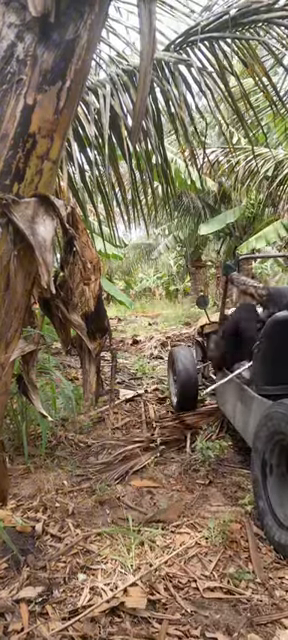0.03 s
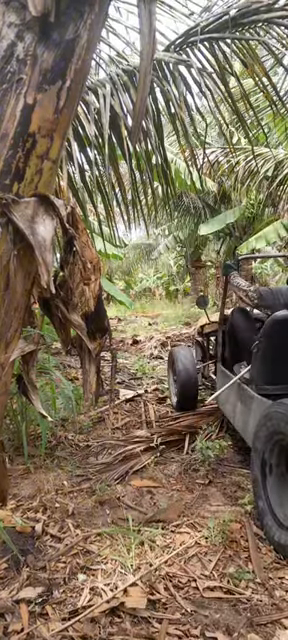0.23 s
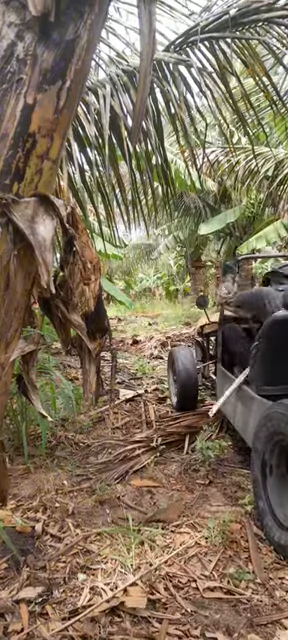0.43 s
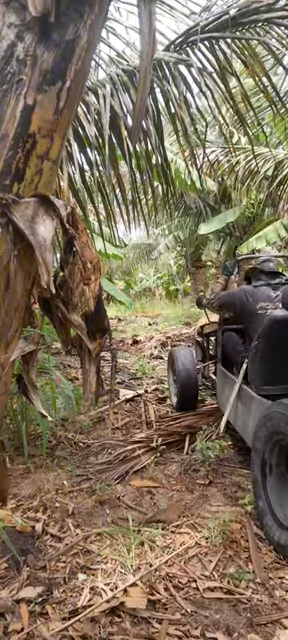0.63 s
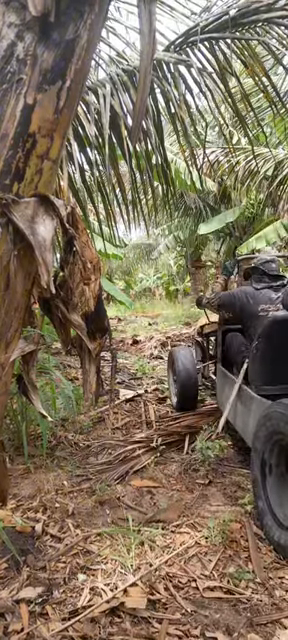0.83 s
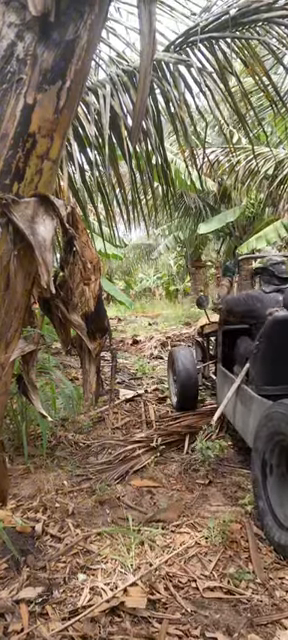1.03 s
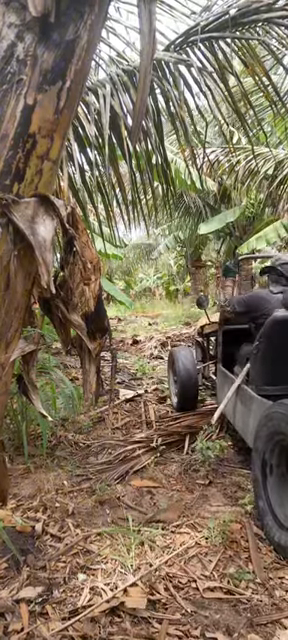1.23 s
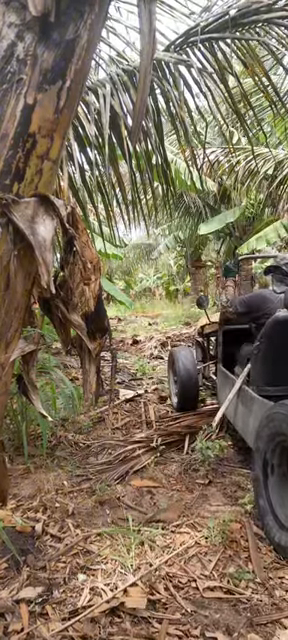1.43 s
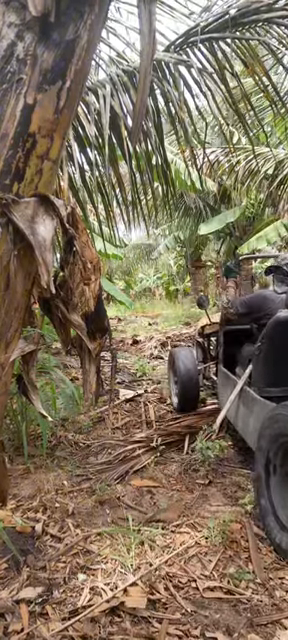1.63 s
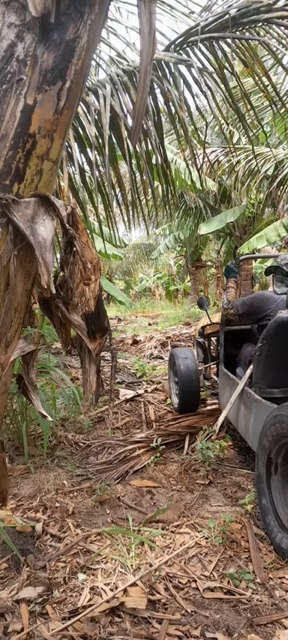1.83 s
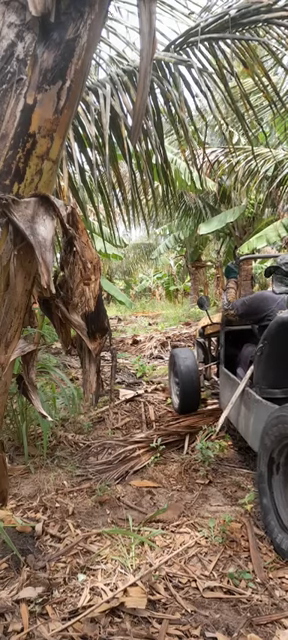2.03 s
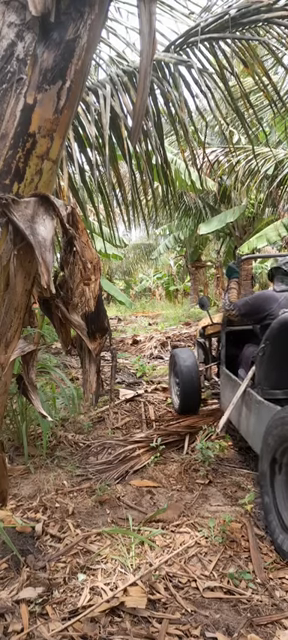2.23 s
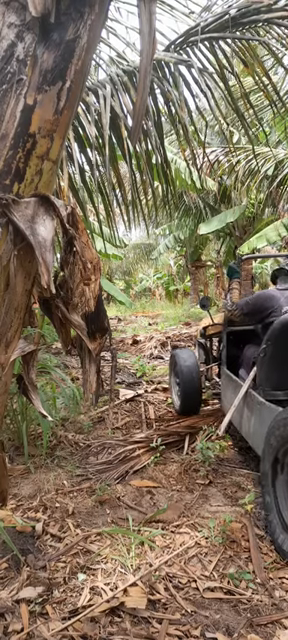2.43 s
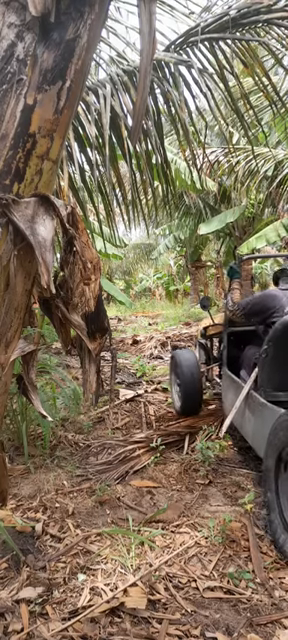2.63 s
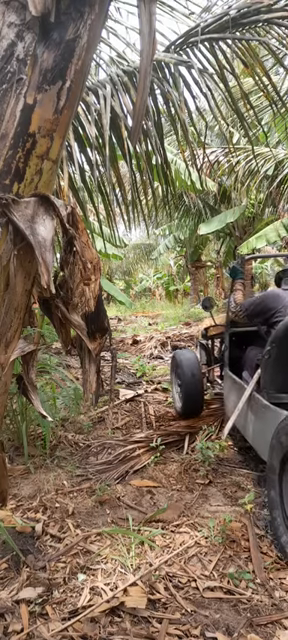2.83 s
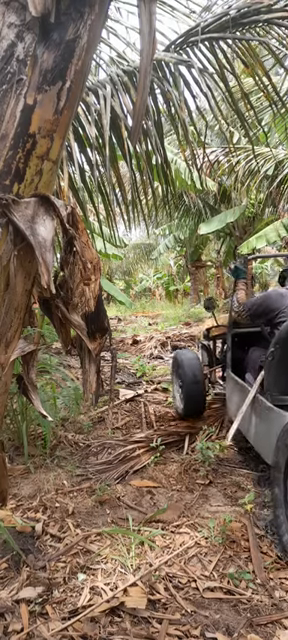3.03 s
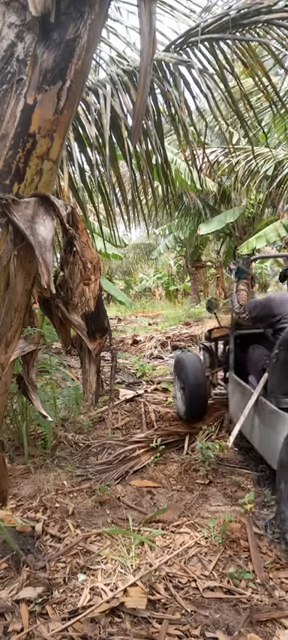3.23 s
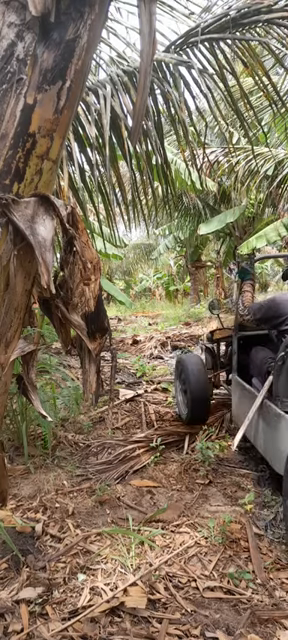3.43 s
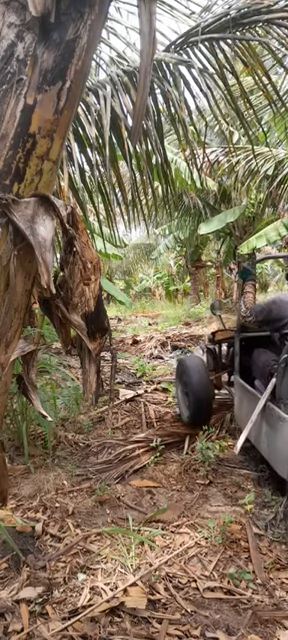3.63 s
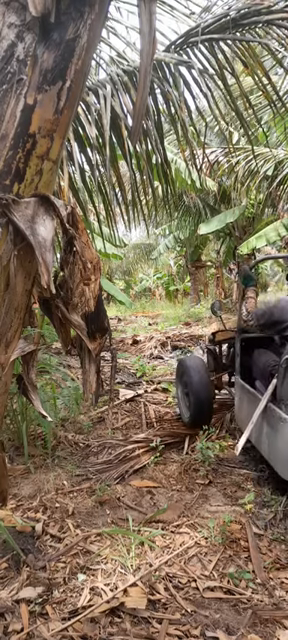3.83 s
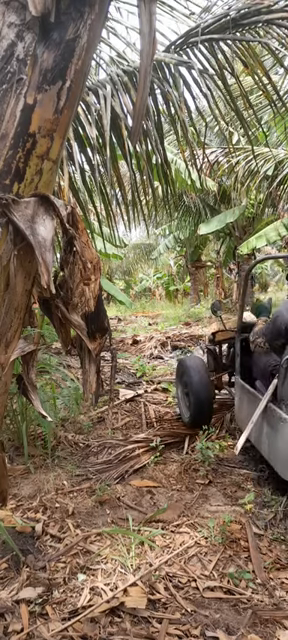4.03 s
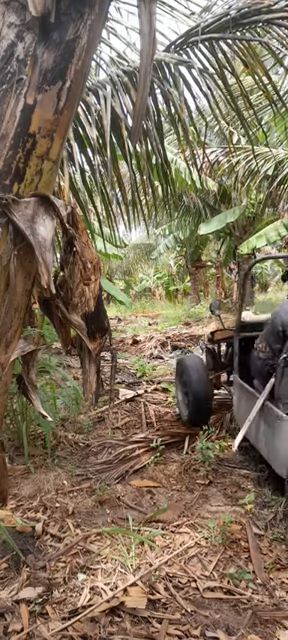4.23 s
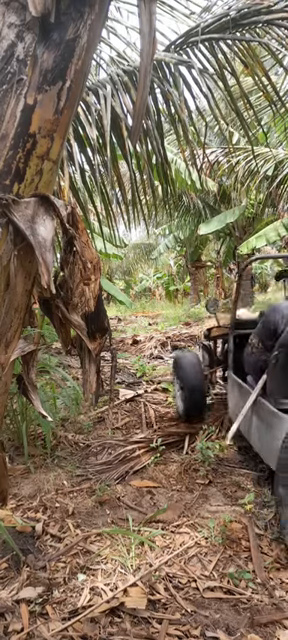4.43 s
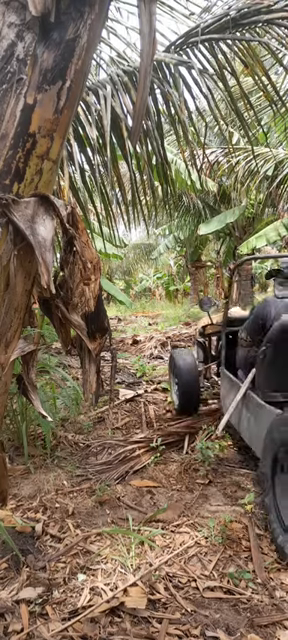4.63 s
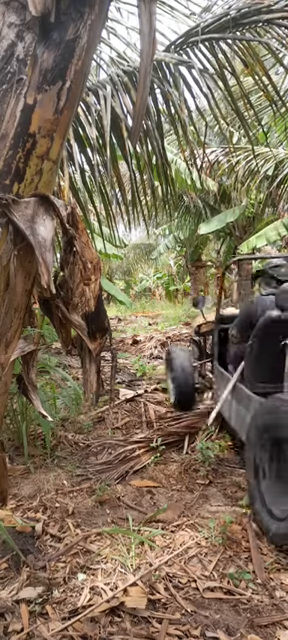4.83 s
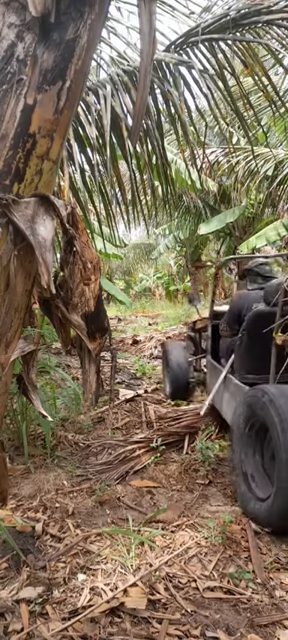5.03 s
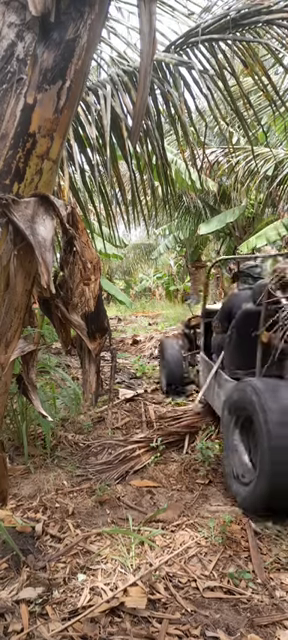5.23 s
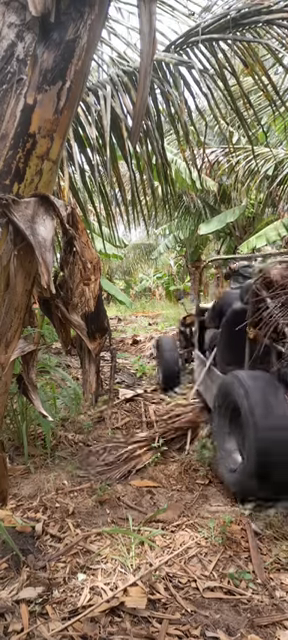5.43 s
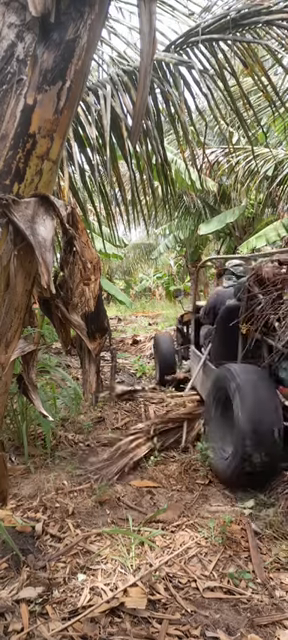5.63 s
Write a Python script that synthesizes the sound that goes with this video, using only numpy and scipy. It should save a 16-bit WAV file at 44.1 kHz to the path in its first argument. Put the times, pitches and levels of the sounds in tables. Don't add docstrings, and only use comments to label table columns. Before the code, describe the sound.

Quiet open air with low generator hum, dry rustling and small clicks, then louder lever clacks and a grinding starter. The engine catches in uneven thumps, falters and catches again, flares with raspy puffs and one backfire, then is revved to a fast buzzing throb before slowing to separate chugs. Close small-camera stereo sound, rattling metal, only slight short echoes from trunks and ground.

```python
import sys
import numpy as np
from scipy import signal
from scipy.fft import rfft, irfft
from scipy.io import wavfile
from scipy.ndimage import uniform_filter1d

SR = 44100
rng = np.random.default_rng(int(sys.argv[2]) if len(sys.argv) > 2 else 0)


def store_pcm(level_fs):
    pcm = np.round(np.clip(level_fs, -1, 1) * 32767).astype(np.int16)
    wavfile.write(sys.argv[1], SR, np.atleast_2d(pcm).T)


def attenuation_scalar(level_db):
    decades = np.asarray(level_db, float) / 20
    return 10 ** decades


N = 251370
TIME = np.arange(N) / SR


def curve(rows, column):
    rows = np.array(rows)
    return np.interp(TIME, rows[:, 0], rows[:, column])


def gains(points):
    hz, db = np.transpose(points)
    return np.interp(np.log(np.arange(N // 2 + 1) * SR / N + 1), np.log(hz + 1), db)


def hiss(points, alike_hz=1600):
    mid, side = (rfft(rng.standard_normal(N)) * attenuation_scalar(gains(points)) for _ in range(2))
    hz = np.arange(N // 2 + 1) * SR / N
    side = side * hz / np.hypot(hz, alike_hz)
    both = irfft(np.array([mid + side, mid - side]), N)
    return both / np.sqrt(np.mean(both ** 2))


def resonate(x, table):
    total = 0
    for hz, width, db in table:
        b, a = signal.iirpeak(hz, hz / width, fs=SR)
        total = total + attenuation_scalar(db) * signal.lfilter(b, a, x)
    return total


def modes(x, table):
    y = resonate(x, table)
    return y / np.sqrt(np.mean(y ** 2))


def walk(rate):
    k = int(SR / rate)
    held = np.repeat(rng.standard_normal(N // k + 1), k)
    return 1.2 * uniform_filter1d(held, k)[:N]


def add(out, s, grain):
    i = max(int(round(s * SR)), 0)
    out[i:i + len(grain)] += grain[:max(N - i, 0)]


def burst(rise_s, fall_s):
    t = np.arange(int(SR * (3 * rise_s + 8 * fall_s))) / SR
    shape = (1 - np.exp(-t / rise_s)) ** 2 * np.exp(-t / fall_s)
    return shape / shape.max()


def swells(rows, column, fall_db_s, floor_db):
    ramps = []
    for row in rows:
        climb_db_s = 20 / row[-1]
        below_db = np.where(TIME < row[0], climb_db_s * (row[0] - TIME), fall_db_s * (TIME - row[0]))
        ramps.append(row[column] - below_db)
    return np.maximum(np.max(ramps, axis=0), floor_db)


# f/Hz, level/dB
GENERATOR_HUM = [(59.2, -48.5), (118.4, -52.5), (226.1, -61.5), (296.1, -60), (506.0, -64.5), (759.0, -60)]
# f/Hz, width/Hz, level/dB
GENERATOR_FAN = [(3110, 83, -2), (3355, 82, 0.1), (3640, 57, -5), (3930, 67, -13), (4600, 93, -14)]


def generator():
    hum = 0
    for hz, db in GENERATOR_HUM:
        wavering_s = TIME + np.cumsum(.014 * walk(20)) / SR
        hum = hum + attenuation_scalar(db + 2 * walk(9.8)) * np.sqrt(2) * np.sin(2 * np.pi * hz * wavering_s)
    fan = attenuation_scalar(-52.5) * modes(hiss([(100, 0), (16000, 0)]), GENERATOR_FAN)
    return hum + fan


# f/Hz, level/dB (per Hz)
AIR = [(18, -48), (30, -31), (43, -12.5), (64, 6), (145, -15), (161, -6.5), (210, -24.5), (303, -5),
       (328, -13), (600, -16), (740, -8.5), (1190, -20.5), (4080, -24.5), (5170, -60.5), (16000, -57)]


def outdoor_air():
    level_db = -44 - 1.5 + 0.5 * walk(2.63)
    return attenuation_scalar(level_db) * hiss(AIR, alike_hz=1390)


# t/s, level/dB, time to climb 20 dB/s
RUSTLE = [(0.0, -50.5, .02), (0.076, -47, .015), (0.19, -48, .04), (0.23, -47, .03), (0.305, -52, .04),
          (0.442, -57, .04), (0.61, -50, .06), (0.896, -57, .01), (0.95, -58, .03), (1.072, -46, .045),
          (1.116, -45, .03), (1.242, -44, .065), (1.35, -38, .03), (1.442, -53, .09), (1.57, -57, .15),
          (1.68, -62, .15)]
# f/Hz, level/dB (per Hz)
LEAVES = [(2650, -15), (4500, 1.5), (6030, -3), (7290, -10.5), (8830, -14), (13100, 1), (16000, -10.5)]


def rustle():
    level_db = swells(RUSTLE, column=1, fall_db_s=240, floor_db=-74)
    return attenuation_scalar(level_db + 2.2 + 2.9 * walk(150)) * hiss(LEAVES)


# t/s, length/s, f/Hz, level/dB
CREAKS = [
    (.16, .1, 105, -43),
    (.46, .14, 224, -42),
]


def seat_creaks():
    total = 0
    for s, length, hz, db in CREAKS:
        swell = np.sqrt(np.sin(np.pi * np.clip((TIME - s) / length, 0, 1)))
        total = total + attenuation_scalar(db + 3 * walk(40)) * swell * np.sin(2 * np.pi * hz * TIME)
    return total


def yard():
    return generator() + rustle() + seat_creaks() + outdoor_air()


# t/s, click level/dB, body level/dB under the click, length/s
KNOCKS = [(0.037, -38, -47, 0.02), (0.076, -39, -47, 0.02), (0.188, -33, -51, 0.025),
          (0.23, -40, -57, 0.014), (0.292, -37, -45, 0.035), (0.44, -38, -31, 0.023),
          (0.464, -50, -42, 0.025), (0.515, -48, -38, 0.027), (0.606, -40, -41, 0.02),
          (0.6389, -42, -44, 0.02), (0.895, -40, -48, 0.018), (0.947, -42, -43, 0.024),
          (1.063, -37, -40, 0.024), (1.115, -33, -47, 0.029), (1.175, -38, -42, 0.02),
          (1.238, -26.5, -36, 0.037), (1.3234, -22.5, -48, 0.026), (1.3423, -14, -31, 0.033),
          (1.438, -21.5, -43, 0.06), (1.5745, -26.5, -37, 0.044), (1.6494, -15.5, -42, 0.022),
          (1.7065, -15, -28, 0.023)]
# f/Hz, level/dB (per Hz)
CLICK = [(710, -32), (1200, -4), (2300, -2), (2830, -2), (3870, -1), (8530, -31.5), (13200, -21),
         (15000, -24), (16000, -27)]


def knocks(boom):
    click, body = np.zeros((2, N))
    for s, click_db, body_db, length in KNOCKS:
        add(click, s, attenuation_scalar(click_db - 11) * burst(0.00048, max(.5 * length, .002)))
        add(body, s, attenuation_scalar(body_db - 0.5) * burst(0.00033, max(0.67 * length, .003)))
    return click * attenuation_scalar(3.3 * walk(700)) * hiss(CLICK) + body * boom


# t/s, rumble level/dB, grind level/dB, time to climb 20 dB/s
HEAVES = [(1.19, -39, -48, .03), (1.244, -29.5, -31, .02), (1.375, -28, -25, .05), (1.532, -32, -36, .06),
          (1.735, -32, -25, .06), (1.8, -30, -28, .027)]
# f/Hz, width/Hz, level/dB
HOUSING = [(405, 45, 0), (545, 55, -3), (200, 30, -5)]


def cranking(boom):
    on_s, off_s, motor_db = 1.1, 1.85, -48
    turning = np.clip((TIME - on_s) / 0.046, 0, 1) * np.clip((off_s - TIME) / 0.06, 0, 1)
    rumble_db = swells(HEAVES, column=1, fall_db_s=120, floor_db=motor_db)
    rumble = attenuation_scalar(rumble_db) * modes(rng.standard_normal(N), [(92, 20, 5.0), (160, 78, -16)])
    grind_db = swells(HEAVES, column=2, fall_db_s=150, floor_db=motor_db) - 2.1
    housing = modes(rng.standard_normal(N), HOUSING)
    grind = attenuation_scalar(grind_db) * (attenuation_scalar(-4) * boom + attenuation_scalar(-3) * housing)
    return turning * (rumble + grind)


# multiple of the note, level/dB
SQUEAK_TONES = [(1, -40), (2, -46), (3, -40), (4, -31), (5, -50)]


def belt_squeak():
    start_s, end_s, from_hz, to_hz = 1.614, 1.654, 1024, 1004
    along = np.clip((TIME - start_s) / (end_s - start_s), 0, 1)
    phase = 2 * np.pi * np.cumsum(from_hz + (to_hz - from_hz) * along ** 2) / SR
    tones = sum(attenuation_scalar(db + 3.5 + 4 * walk(200)) * np.sin(k * phase) for k, db in SQUEAK_TONES)
    return np.sqrt(np.sin(np.pi * along ** 2.1)) * tones


# f/Hz, width/Hz, level/dB
BODY = [(223, 31, 10.5), (354, 34, 2.5), (482, 49, 1.7), (635, 66, -1.5), (1033, 430, -2.5)]


def starting():
    boom = modes(hiss(AIR[4:]), BODY)
    return knocks(boom) + cranking(boom) + belt_squeak()


# t/s, speed/rpm
SPEED = [(2.6583, 1020.4), (2.7, 1171.0), (2.85, 1879.0), (2.9, 1573.5), (3.0, 1610.8), (3.12, 1411.1),
         (3.405, 1224.8), (3.461, 1430.8), (3.53, 891.6), (3.649, 1134.1), (3.736, 1092.6), (4.007, 1853.0),
         (4.283, 1943.3), (4.501, 1733.6), (4.671, 1573.0), (4.959, 1107.4), (5.364, 771.0), (5.7, 870.0)]
# t/s, burn level/dB
THROTTLE = [(2.6, -30), (2.66, -8), (2.72, -12.5), (2.84, -15), (2.87, -35), (3.2, -42), (3.41, -31),
            (3.5, -34), (3.7, -19), (3.83, -11), (3.98, -14), (4.11, -15.5), (4.6, -14.5), (4.69, -22),
            (5.11, -21), (5.54, -20), (5.68, -16)]
# f/Hz, level/dB (per Hz)
GEAR = [(210, -5), (350, -7), (452, -1), (653, -11), (1010, -2), (1380, -25.5), (1600, -11), (2460, -16.5),
        (3340, -12), (8710, -33.5), (11300, -23.5), (14800, -29.5), (16000, -19)]
# f/Hz, width/Hz, level/dB
COVERS = [(1007, 100, -1.5), (1775, 90, -4.5), (2075, 72, -1.5), (3220, 99, 1), (4370, 97, 0)]


def decades(rpm):
    full_rpm = 1900
    return np.log10(rpm / full_rpm)


def clatter_db():
    engages_s, lets_go_s, slowest_rpm, mesh_db = 1.6, 2.88, 640, 7.5
    rpm = np.interp(TIME, *np.transpose([(SPEED[0][0] - .08, slowest_rpm)] + list(SPEED)))
    running_db = -28.5 + 42 * decades(rpm) + .06 * curve(THROTTLE, 1)
    drag_db = 9 * np.exp(-np.abs(TIME - 1.8) / .3)
    meshed = np.clip((lets_go_s - TIME) / .08, 0, 1)
    not_yet_db = 30 * np.clip((engages_s + .05 - TIME) / .15, 0, 2)
    return running_db + (mesh_db + drag_db) * meshed - not_yet_db


def clatter():
    steady_db = clatter_db()
    gear = attenuation_scalar(steady_db + 2.2 + 2.4 * walk(60) + 2.24 * walk(400)) * hiss(GEAR, alike_hz=1390)
    ticks_per_s = 160
    ticks = (rng.random(N) < ticks_per_s / SR) * attenuation_scalar(4.2 * rng.standard_normal(N))
    return gear + attenuation_scalar(steady_db - 11) * modes(ticks, COVERS)


# t/s, pressure level/dB, burn level/dB
CATCH = [(1.8078, -6, -12), (1.8717, -7, -10), (1.921, -3.5, -6.5), (1.9638, -2, -8), (2.0005, -9.5, -33),
         (2.049, -14.5, -44), (2.0965, -16.5, -39), (2.1505, -10, -15), (2.1937, -4.5, -11),
         (2.2385, -4, -10), (2.2855, -6.5, -14), (2.3299, -12.5, -29.5), (2.377, -11, -43),
         (2.427, -13, -40), (2.4795, -15, -47), (2.538, -5.5, -12), (2.581, -5, -9.5), (2.6209, -6.5, -10)]
# lateness/s, thump f/Hz, thump t60/s, thump level/dB, puff level/dB, snap share
STUBS = [(0, 101, 0.085, -10.5, -10, .1), (.0004, 116, 0.051, -4, -8.5, 0.58),
         (-.0032, 95, 0.066, -5, 0, 0.51), (-.0028, 88, 0.055, -4.5, -0.3, 0.98)]
# start f/Hz, climb per stroke, quickening, fade/dB per stroke, length/strokes, level/dB
RINGS = [(109.6, .6, 0.154, 13.5, 2, -2.5), (229.2, 0.748, 0.019, 9, 1.3, -25.5),
         (236.2, 0.743, .02, 12, 1.28, -25), (236.5, 0.85, .1, 9, 1.25, -20)]


def strokes():
    done = np.cumsum(curve(SPEED, 1) * (TIME > SPEED[0][0])) / SR / 30
    s = np.interp(np.arange(int(done[-1]) + 1) + 1e-6, done, TIME)
    burn_db = np.interp(s, *np.transpose(THROTTLE))
    rpm = np.interp(s, *np.transpose(SPEED))
    pressure_db = -1.7 + 21 * decades(rpm) + .18 * burn_db
    pressure_db = pressure_db + 4.5 * np.exp(-(s - s[0]) / .07)
    s = s + np.array(STUBS)[np.arange(len(s)) % 4, 0]
    s, pressure_db, burn_db = np.c_[np.transpose(CATCH), [s, pressure_db, burn_db]]
    which = (np.arange(len(s)) - len(CATCH)) % 4
    stub, ring = np.array(STUBS)[which], np.array(RINGS)[which]
    chance = rng.standard_normal((3, len(s)))
    thump_db = pressure_db + stub[:, 3] + .45 * chance[0]
    ring_db = pressure_db + ring[:, -1] + .45 * chance[1]
    puff_db = burn_db + stub[:, 4] + 1.36 * chance[2]
    return s, which, thump_db, ring_db, puff_db


def thump(t, which, gap_s, unburnt):
    _, hz, t60, _, _, snappy = STUBS[which]
    hz = hz * (1 + 0.12 * unburnt)
    before, after = np.minimum(t, 0), np.maximum(t, 0)
    swing = -np.cos(2 * np.pi * hz * t) * np.exp(-(before / 0.0063) ** 2 - np.log(1000) * after / t60)
    snap = np.exp(np.minimum(t + .004, 0) / .0022 - (np.maximum(t + .004, 0) / .0012) ** 2)
    snap_share = snappy * (0.37 + 0.016 / gap_s + 0.55 * unburnt)
    return (1 - 0.41 * unburnt) * swing + snap_share * snap


def climbing_ring(t, which, gap_s, unburnt):
    ring_hz, climb, quickening, fade_db, lasts, _ = RINGS[which]
    before, after = np.minimum(t, 0), np.maximum(t, 0)
    fade_db = fade_db * (1 - 0.16 * unburnt) + 6 * unburnt * np.maximum(after / gap_s - .8, 0)
    turn = np.minimum(after / gap_s, lasts)
    note_hz = ring_hz * np.exp(climb * turn + quickening * turn ** 2)
    cycles = np.cumsum(note_hz) / SR + ring_hz * t[0]
    favour_db = 7.93 * (1 - .8 * unburnt) * np.exp(-((note_hz - 477) / 70.6) ** 2)
    favour_db = favour_db - 6.5 * np.exp(-((note_hz - 293) / 45) ** 2)
    shut = np.clip((lasts - turn) / 0.4, 0, 1)
    fade = attenuation_scalar(favour_db - fade_db * turn) * shut * np.exp(-(before / 0.0064) ** 2)
    return fade * np.cos(2 * np.pi * cycles)


WHISTLE_HZ = [992, 1080, 1148, 1080]


def valve_whistle(which, gap_s, puff_db):
    pip = burst(.002, 0.0027)
    t = np.arange(len(pip)) / SR
    hz = WHISTLE_HZ[which] * (1.06 - .002 / gap_s + 0.056 * rng.standard_normal()) * (1 + 18 * t)
    level_db = 0.55 * puff_db - 14 + 2.5 * rng.standard_normal()
    return attenuation_scalar(level_db) * pip * np.sin(2 * np.pi * np.cumsum(hz) / SR)


def gap_sweep(puff_db):
    pip = burst(.002, 0.0027)
    t = np.arange(len(pip)) / SR
    flutter = 1 + 0.46 * uniform_filter1d(rng.standard_normal(len(pip)), size=24)
    hz = 4200 * (1 + 0.1204 * rng.standard_normal()) - 3000 * np.exp(-t / 0.002933)
    level_db = puff_db - 5.5 + 1.8 * rng.standard_normal()
    return attenuation_scalar(level_db) * pip * np.sin(2 * np.pi * np.cumsum(hz * flutter) / SR)


def exhaust():
    s, stub, thump_db, ring_db, puff_db = strokes()
    gap_s = np.gradient(s)
    low, whistle, jet = np.zeros((3, N))
    lead_s = .02
    t = np.arange(int(.14 * SR)) / SR - lead_s
    for k, which in enumerate(stub.astype(int)):
        unburnt = np.clip((STUBS[which][4] - 27 - puff_db[k]) / 8, 0, 1)
        push = attenuation_scalar(thump_db[k]) * thump(t, which, gap_s[k], unburnt)
        ring = attenuation_scalar(ring_db[k] + 0.99 * unburnt) * climbing_ring(t, which, gap_s[k], unburnt)
        add(low, s[k] - lead_s, push - ring)
        opens_s = s[k] - .0055 - .16 * gap_s[k]
        add(whistle, opens_s - .002, valve_whistle(which, gap_s[k], puff_db[k]))
        add(whistle, opens_s - .0005, gap_sweep(puff_db[k]))
        add(jet, opens_s - 0.0003, attenuation_scalar(puff_db[k]) * burst(.0024, 0.0041))
        add(jet, opens_s, attenuation_scalar(puff_db[k] - 14.5) * burst(0.0046, .018))
    return low, whistle, jet


# f/Hz, level/dB (per Hz)
BANG = [(290, -35), (500, -3.5), (1180, -4), (2390, -13), (2890, -18), (3390, -6), (8960, -33),
        (14700, -24), (16000, -37)]


def backfire():
    bang = np.zeros(N)
    add(bang, 3.021 - .002, attenuation_scalar(-10) * burst(0.0009, 0.0055))
    return bang * hiss(BANG)


# f/Hz, width/Hz, level/dB
PIPES = [(202.6, 42, -4), (265, 36, 3.5), (369, 33, -2.5)]
# f/Hz, level/dB (per Hz)
JET = [(410, -45), (700, -12.5), (1210, -5), (1500, -8.5), (1730, -5.5), (2630, -11.5), (3370, -5.5),
       (4490, -6.5), (5470, -10), (5920, -14.5), (9110, -23), (13100, -9), (16000, -13)]


def engine():
    low, whistle, jet = exhaust()
    pipe_db = 5.5 + .2 * curve(THROTTLE, 1)
    low = low + attenuation_scalar(pipe_db) * resonate(low, PIPES)
    gas = jet * attenuation_scalar(-2.0 + 1.5 * walk(500)) * hiss(JET, alike_hz=2100)
    return low + gas + whistle + clatter() + backfire()


def scene():
    buggy = engine() + starting()
    t = np.arange(int(.15 * SR)) / SR
    trunks = rng.standard_normal((2, len(t))) * attenuation_scalar(-60 * t / 0.11) * (t > .004)
    bright = signal.sosfilt(signal.butter(2, 900, "high", fs=SR, output="sos"), buggy)
    echoes = attenuation_scalar(-30.5) * signal.fftconvolve(bright, trunks, axes=1)[:, :N]
    return buggy + echoes + yard()


def roll_off(x):
    return signal.sosfilt(signal.butter(12, 16980, fs=SR, output="sos"), x)


# f/Hz, left minus right level/dB
PORTS = [(60, 0.5), (110, 0.5), (200, 1), (380, 0), (700, 3.0), (1290, 1.5), (2380, -1.5), (4400, -5),
         (8120, 16), (15000, -4.5)]


def record(dry):
    tilt_db = gains(PORTS) / 2
    ports = irfft(rfft(dry) * attenuation_scalar(np.array([tilt_db, -tilt_db])), N)
    ports = signal.sosfiltfilt(signal.butter(2, 49, "high", fs=SR, output="sos"), ports)
    ports = signal.sosfilt(signal.ellip(8, .3, 50, 15900, fs=SR, output="sos"), ports)
    mix = np.clip(np.tanh(0.62 * ports) / 0.63, -.95, .95)
    return roll_off(mix)


dry = scene()
out = record(dry)
store_pcm(out)
```